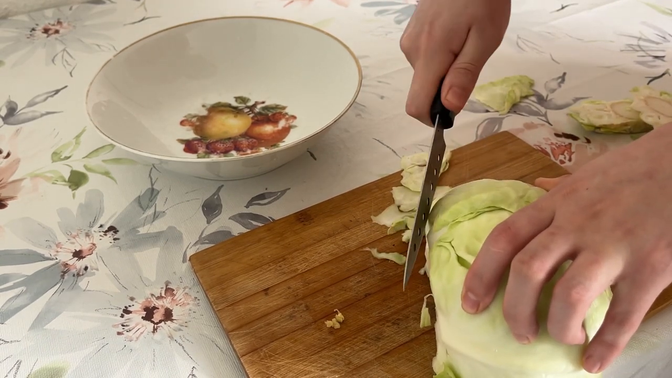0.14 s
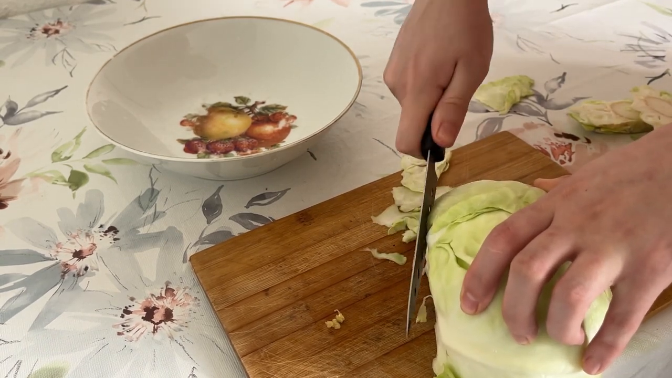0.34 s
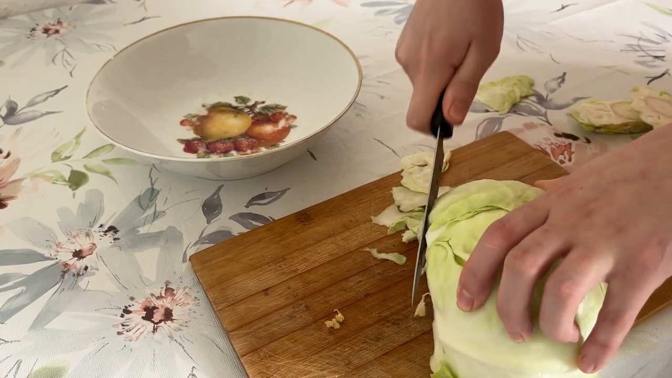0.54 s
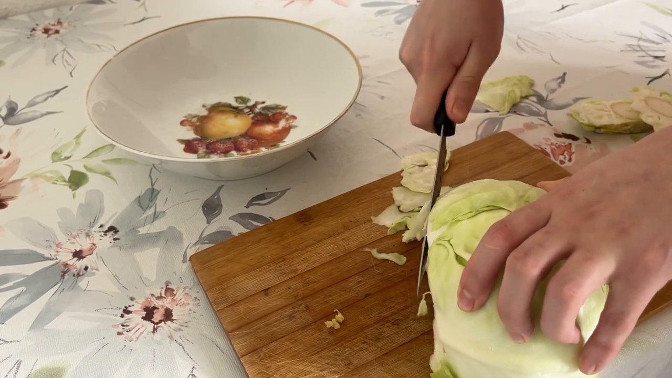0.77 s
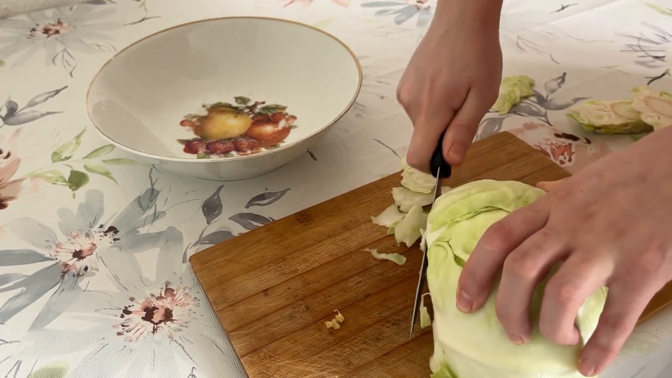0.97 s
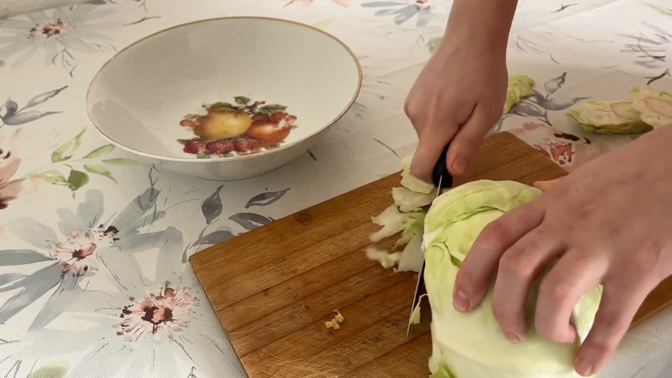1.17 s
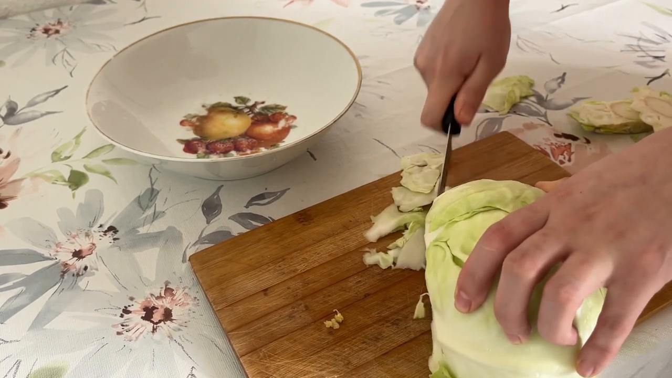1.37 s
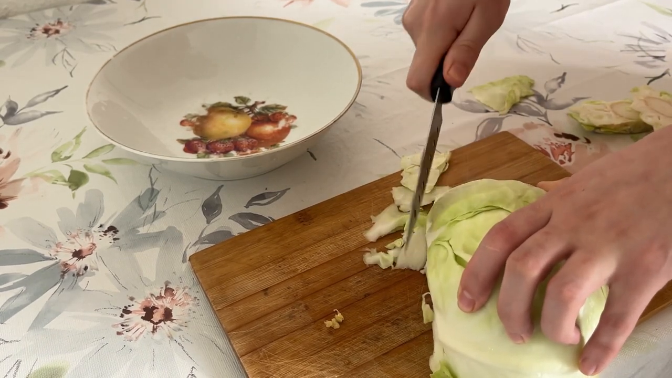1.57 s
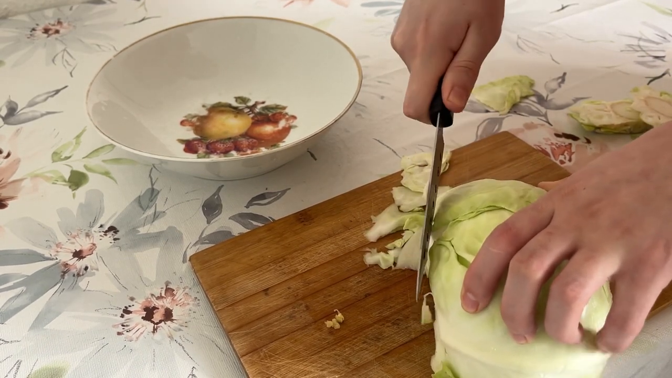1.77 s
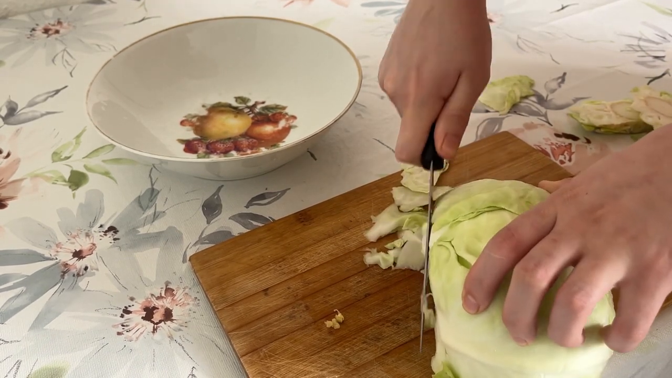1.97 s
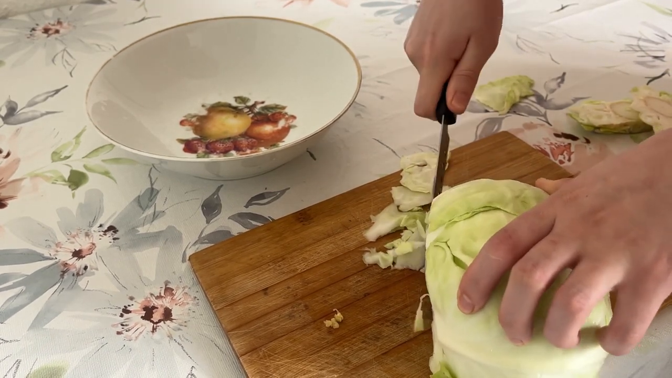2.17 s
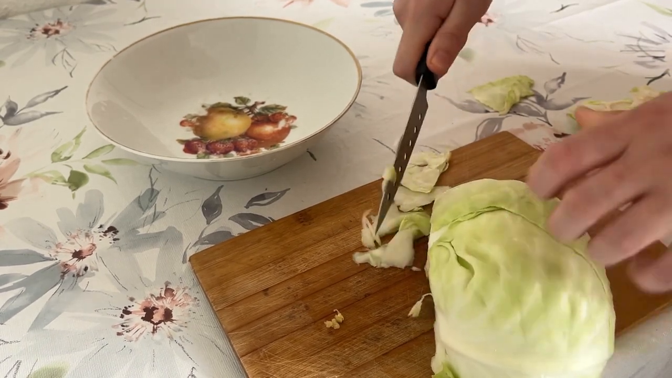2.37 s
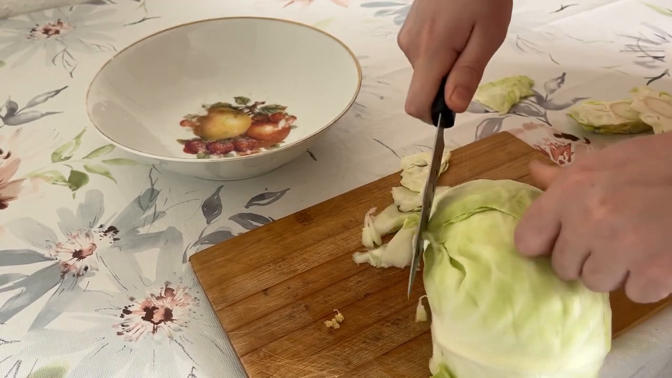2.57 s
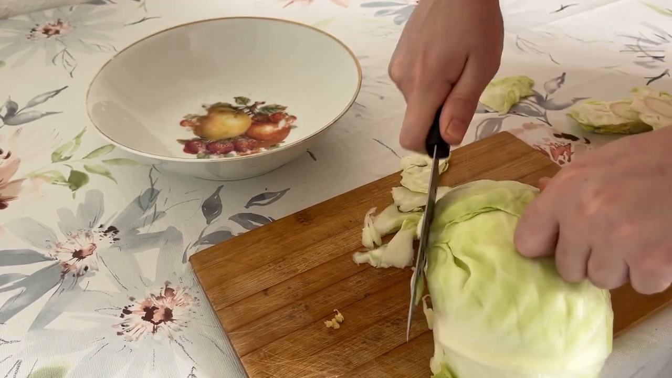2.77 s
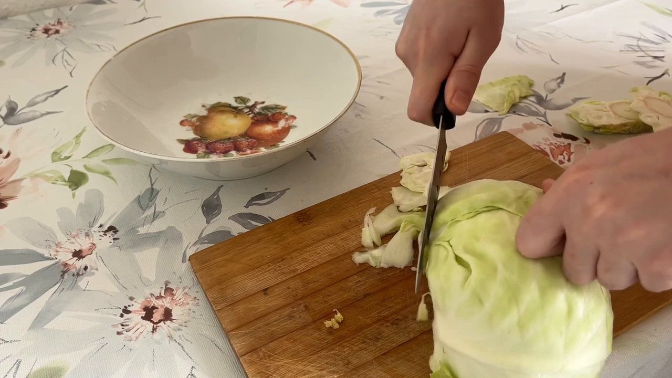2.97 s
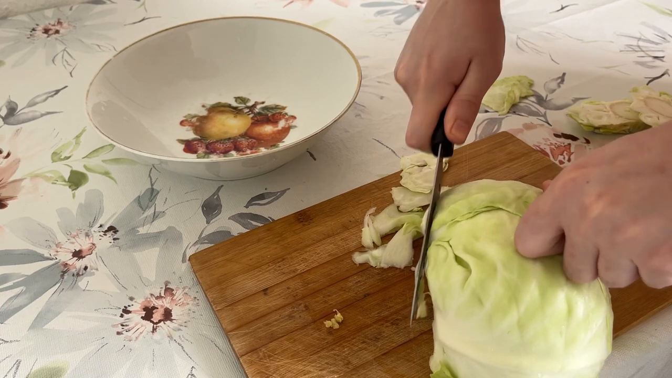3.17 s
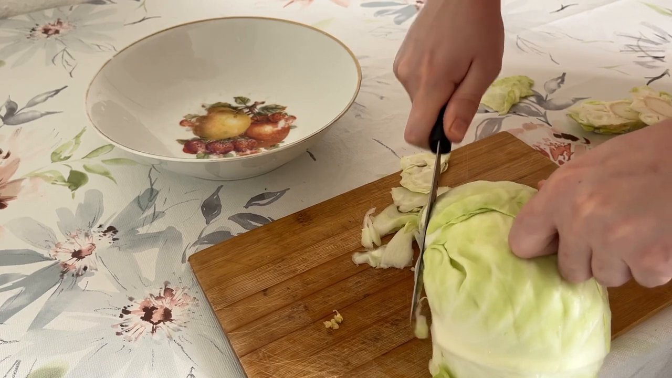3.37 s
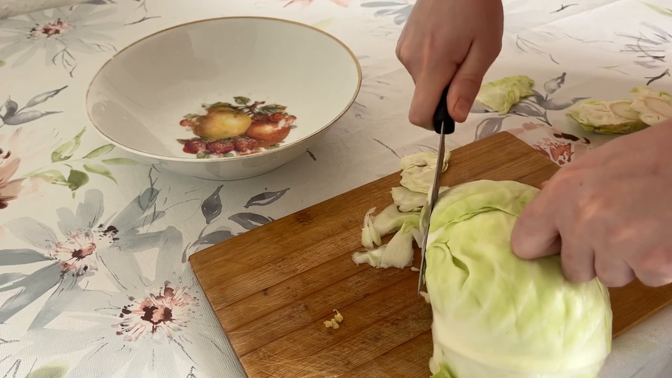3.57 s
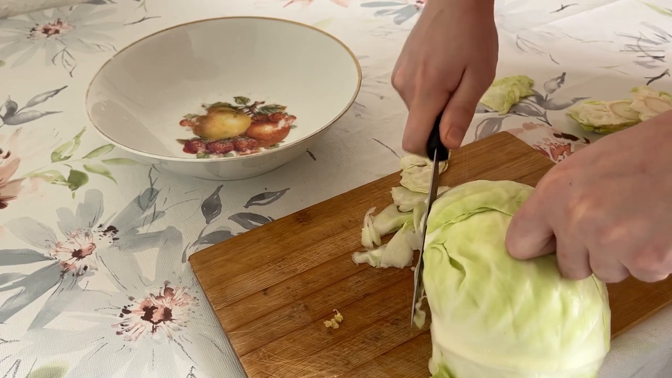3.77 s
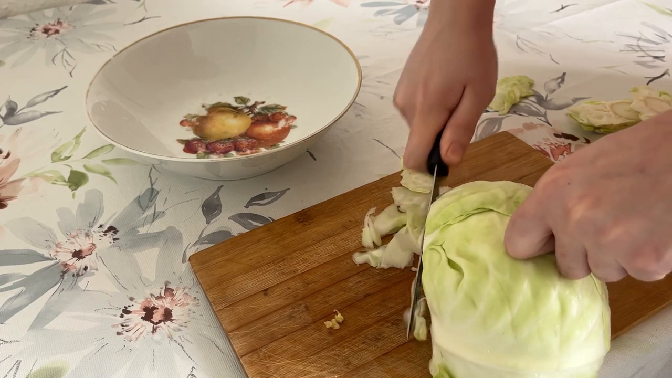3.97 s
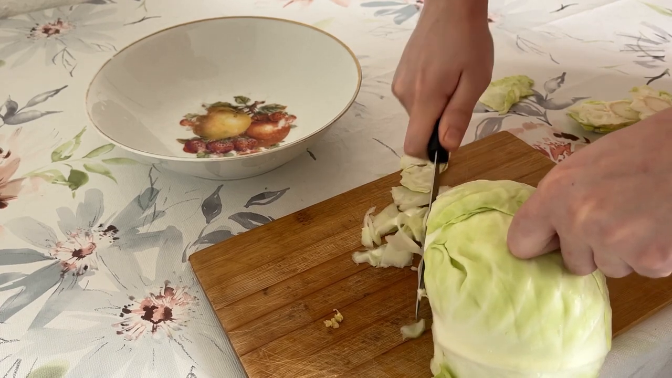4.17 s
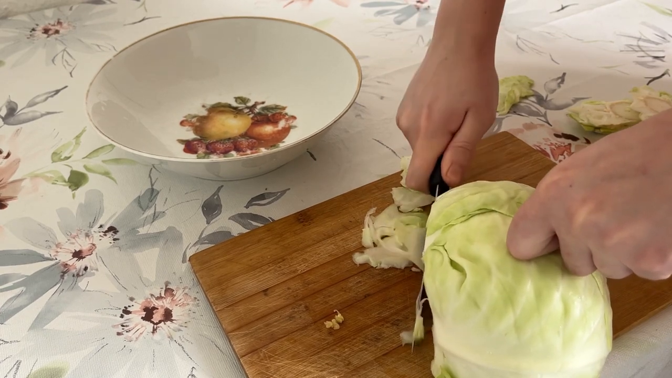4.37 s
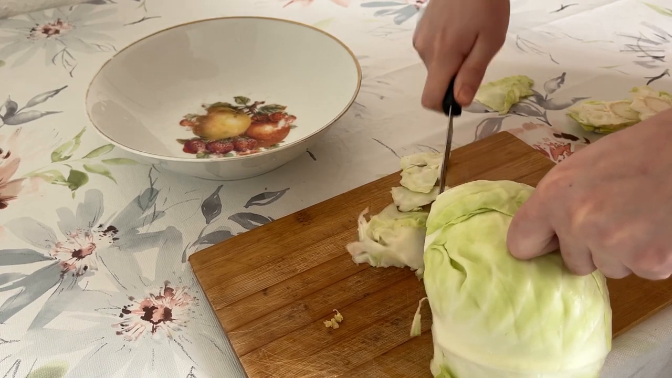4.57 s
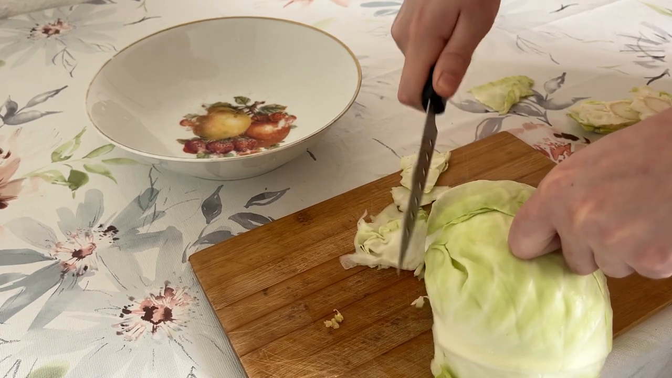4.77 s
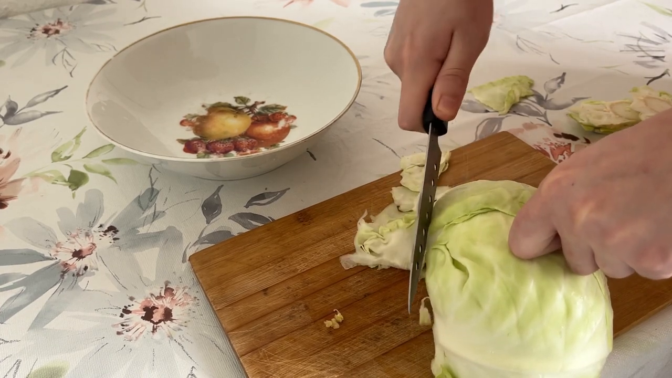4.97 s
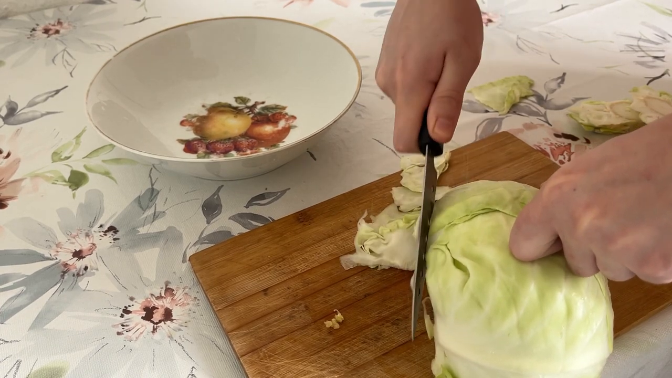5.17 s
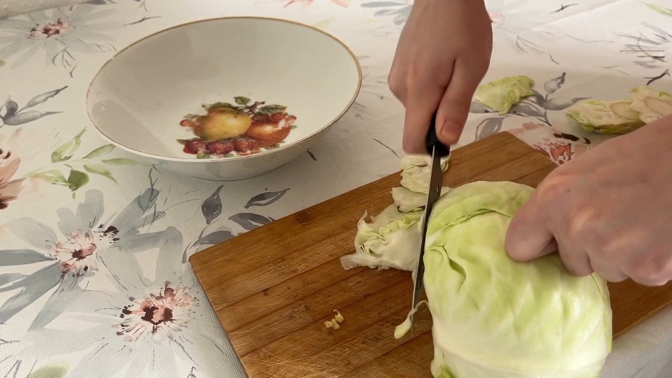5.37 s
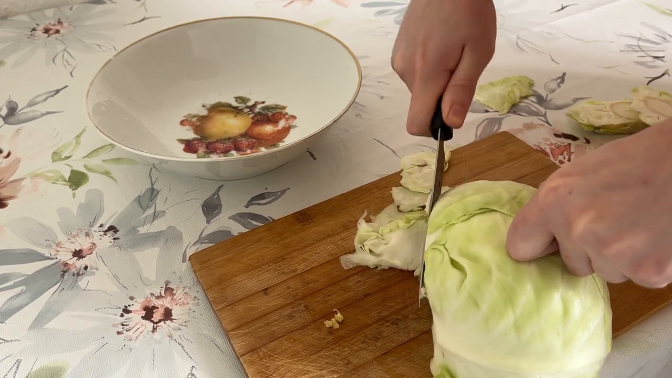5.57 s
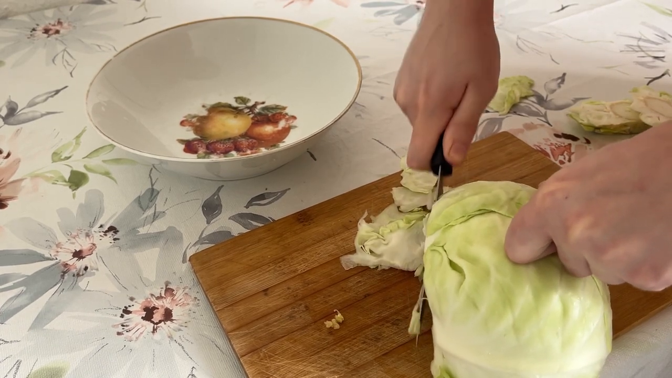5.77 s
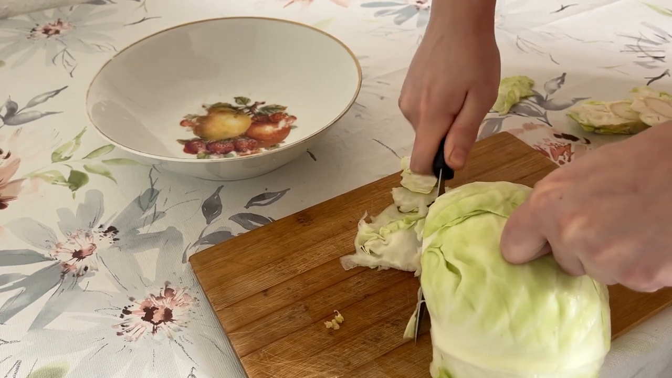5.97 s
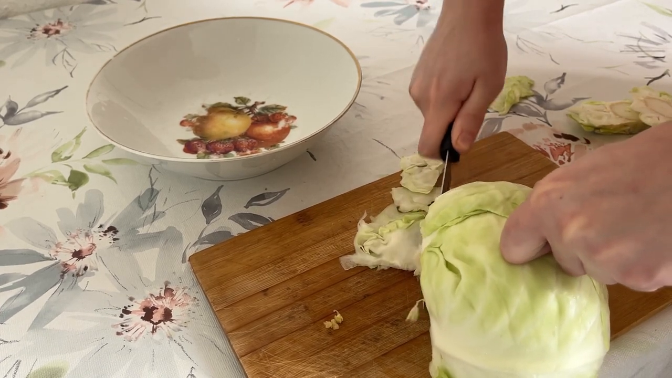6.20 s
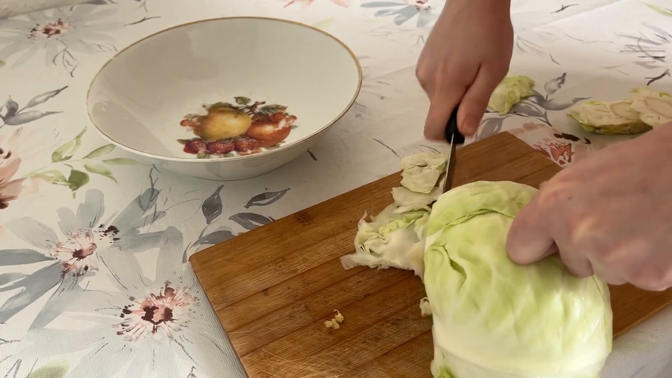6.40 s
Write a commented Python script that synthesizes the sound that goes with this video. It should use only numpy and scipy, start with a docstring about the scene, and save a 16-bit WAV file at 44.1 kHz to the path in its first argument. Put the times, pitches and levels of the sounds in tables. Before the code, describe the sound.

Close, wet crackling of cabbage being sliced, with snapping ribs, brief blade squeaks and a few woody knocks in a small quiet kitchen.

```python
"""A small kitchen: a knife saws through a cabbage on a wooden board, close to a pair of small microphones.
Each stroke is a dense crackle of random fractures, coarse tearing plus fine fizz; single ribs snap as noise bursts.
The blade knocks on the board (modal ring plus steel tick) and drags over it (random slips into the same modes).
Gliding resonances squeak and decaying low sines thump.
A low hum wavers over room noise; dense decaying reflections give the reverberation."""
import sys
import numpy as np
from scipy import signal
from scipy.fft import rfft, irfft
from scipy.io import wavfile
from scipy.ndimage import uniform_filter1d

SR = 44100
rng = np.random.default_rng(int(sys.argv[2]) if len(sys.argv) > 2 else 0)


def waveform_to_disk(signal):
    """Save audio, clipped to [-1, 1], as 16-bit WAV at the path in sys.argv[1]."""
    frames = np.transpose(np.atleast_2d(signal))
    scaled = np.clip(frames, -1, 1) * 32767
    samples = np.round(scaled).astype(np.int16)
    wavfile.write(sys.argv[1], SR, samples)


N = 283959
T = np.arange(N) / SR  # s

# Room noise spectrum. Each row: frequency in Hz, relative density in dB per Hz.
AIR_SPECTRUM = [(24, -26.5), (40, 4.5), (65, 8.5), (110, 4), (165, -8.5), (270, -2.5), (360, -8), (470, -7),
                (700, -17), (950, -11), (1600, -18.5), (2300, -30.5), (5000, -44.5), (15000, -84.5)]
# Low hum. Each row: time in seconds, relative level in dB, mean pitch in Hz.
HUM_CURVE = [(0.0, -41.5, 54.9), (0.68, -46, 53.74), (0.81, -62, 57.6), (0.84, -43, 61), (0.9, -55, 58.8),
             (1.22, -53, 53.3), (2.29, -42, 53.2), (2.54, -55.5, 53), (2.72, -46.5, 55.6),
             (2.83, -57, 64.9), (2.92, -52, 65.3), (3.08, -54, 55.9), (3.19, -43, 56.0), (3.3, -54, 55.4),
             (3.68, -47, 61.74), (4.02, -40.5, 61.36), (4.86, -56.5, 58.6), (5.09, -57, 55.24),
             (5.38, -51, 59.2), (5.54, -51, 54.5), (6.38, -50.5, 52.77), (6.44, -58, 52)]
# Nearly steady hum lines. Each row: mean frequency in Hz, level in dB.
HUM_LINES_HZ_DB = [(98, -57.5), (120, -77), (199, -63)]
# Sawing strokes, to and fro. Each row: start in seconds, speeding up in seconds, slowing down in seconds,
# crunch in dB, juicy fizz relative to the crunch in dB, hollow body of the head relative to the crunch in dB.
SAW_STROKES = [(0.181, 0.13, 0.1, -58.5, 1.5, 2), (0.36, 0.1, 0.11, -64.5, 2.5, 1),
               (0.51, 0.047, 0.15, -51, 0, -0.5), (0.785, 0.063, 0.21, -52.5, -0.5, -0.5),
               (0.96, 0.1, .13, -64.5, -4, 1), (1.09, 0.042, 0.031, -44, -2.5, -3.5),
               (1.135, 0.028, 0.13, -48.5, -14, 13), (1.248, .095, 0.14, -51, -4.5, 3),
               (1.745, 0.19, 0.04, -52.5, 2, -1.5), (1.959, .015, 0.18, -54.5, -4.5, -4.5),
               (2.061, 0.017, 0.1, -60, -4.5, 18), (2.47, 0.078, 0.35, -72, -11, 12),
               (2.59, 0.2, 0.071, -59.5, -2, 0), (2.81, 0.11, 0.17, -61.5, -9, -6),
               (2.995, 0.057, 0.15, -54, -2.5, -1), (3.12, 0.12, 0.095, -66, 0, 3),
               (3.285, 0.081, 0.13, -58.5, -1, 3), (3.46, 0.057, 0.1, -66, -3, 0.5),
               (3.57, 0.078, 0.29, -61, -0.5, 2), (3.859, .155, 0.087, -53, -2, 1.5),
               (4.11, 0.033, 0.15, -56, -12, -5.5), (4.23, 0.084, 0.067, -46.5, -1.5, 1),
               (4.35, .14, 0.19, -50, -7, 3.5), (4.82, 0.079, 0.069, -63.5, -2, -5),
               (4.98, 0.098, 0.15, -58, -2, -5.5), (5.14, 0.089, 0.13, -58, -7, -5),
               (5.27, 0.13, 0.1, -54, -5, 2), (5.47, 0.036, 0.18, -61.5, -5, 1),
               (5.595, 0.073, 0.095, -45.5, -2, -0.5), (5.73, 0.067, 0.22, -61, -8, -2.5),
               (5.885, 0.088, 0.077, -49, -3, -3), (6.0, 0.12, 0.17, -55.5, -4.5, -9),
               (6.174, 0.026, 0.13, -48.5, -7.5, 7.5), (6.31, 0.11, 0.26, -53, -7, 0)]
# Coarse tearing of the leaf ribs. Each row: frequency in Hz, relative gain in dB.
TEAR_SPECTRUM = [(100, 7), (300, 6.5), (700, 11.5), (1100, 8.5), (1800, 5.5), (2400, 3), (3200, 2.5),
                 (4200, 2), (6500, -3), (8000, -7.5), (10000, -4.5), (14000, -43.5)]
# Fine bursting of cells. Each row: frequency in Hz, relative gain in dB.
FIZZ_SPECTRUM = [(3000, -43), (6500, -0.5), (8500, -6), (11000, 0), (13000, 0), (15700, -6.5)]
# Wet steel squeaking on leaf or wood. Each row: start in seconds, length in seconds, level in dB,
# starting pitch in Hz, ending pitch in Hz, relative width in Hz.
BLADE_SQUEAKS = [(0.845, 0.087, -50.5, 3370, 3170, 800), (1.108, 0.081, -35, 1677, 1670, 60),
                 (1.296, 0.086, -33.5, 1830, 1940, 199), (1.277, 0.097, -43.5, 3080, 3270, 1090),
                 (1.787, 0.063, -54, 1286, 1240, 130), (2.081, 0.038, -36.5, 940, 880, 318),
                 (4.419, .12, -36, 1760, 1870, 220), (4.413, 0.099, -43.5, 3000, 2940, 802),
                 (4.99, 0.17, -59.5, 4180, 4350, 800), (5.162, 0.045, -53, 4105, 4050, 600),
                 (5.29, 0.15, -55.5, 6800, 6200, 1190), (5.334, 0.057, -54, 910, 922, 130),
                 (5.643, 0.052, -40, 890, 780, 259), (5.978, 0.17, -45.5, 1626, 1396, 218.6),
                 (6.36, 0.24, -42.5, 1830, 1920, 190)]
# Single ribs snapping. Each row: time in seconds, relative peak in dB, centre in Hz,
# treble relative to the body in dB.
RIB_SNAPS = [(0.9514, -39, 4430, -6), (1.6402, -56.5, 4540, -1), (1.9726, -25, 2730, 1),
             (2.2185, -45, 2550, -11), (2.383, -46.5, 6160, -17.5), (2.5274, -51, 4450, -4),
             (3.1373, -45, 4500, -5), (3.187, -41.5, 2200, -12), (3.498, -37, 2300, -7),
             (3.7503, -52, 6955, -5), (4.141, -39, 3036, -16), (5.168, -35.5, 4994, -7),
             (5.5073, -34.5, 4300, -26), (5.62, -37.5, 5500, -12), (5.7438, -36.5, 2754, -13),
             (6.074, -30, 2880, -17), (6.185, -25, 2400, -10), (6.326, -39, 2870, -24)]
# Blade landing on the board. Each row: time in seconds, force in dB, sharpness of the blow in Hz,
# boost of the modes at 1-2 kHz in dB, ring time as a factor.
BLADE_KNOCKS = [(1.1335, -1.5, 4260, 0.5, 1.02), (2.0729, -15, 2330, -14.5, 1.08),
                (2.096, -27, 2400, -7.5, 1.3), (3.751, -37.5, 1790, 1.5, 0.87),
                (4.3173, -3, 1720, 0.5, 0.74), (5.9702, -4.5, 1930, 2, 0.7), (6.072, -36, 3060, 2, 1),
                (6.1845, -17.5, 4000, -2, 0.38), (6.1964, -23, 2410, -8, 0.47),
                (6.201, -13, 2770, 0.5, 0.77), (6.327, -44, 3980, -5, 0.93)]
# Modes of the board with the blade on it. Each row: frequency in Hz, height in dB,
# t60 in seconds at a ring factor of 1.
BOARD_MODES = [(194, -27, 0.12), (290, -19, 0.037), (461, -18.5, 0.056), (725, -23.5, 0.043),
               (873, -17, 0.16), (938, -10, 0.044), (1234, -14, 0.016), (1352, -12, 0.037),
               (1564, -10.5, 0.011), (1770, -10, 0.011), (1882, -11.5, 0.025), (2660, -24.5, 0.023),
               (3123, -9.5, 0.0094)]
# How well the board radiates. Each row: frequency in Hz, gain in dB.
BOARD_RADIATION = [(40, -29.5), (160, -3), (350, -9), (450, -1.5), (1900, 1), (2200, 2.5), (2800, 4),
                   (3400, 3), (4200, -3), (8000, -17)]
# Edge dragging over the board. Each row: start in seconds, speeding up in seconds, slowing down in seconds,
# relative level in dB, sharpness of the slips in Hz.
EDGE_DRAGS = [(1.19, 0.088, 0.12, -38, 3240), (1.26, 0.11, 0.104, -37.5, 4340),
              (1.39, .022, .025, -39.5, 1500), (4.25, 0.051, 0.075, -43, 2500), (4.34, .14, .15, -35, 3000),
              (4.47, .04, .075, -38, 1050), (5.605, 0.081, 0.11, -44.5, 630),
              (5.99, 0.049, 0.089, -38.5, 1300), (6.09, 0.064, 0.031, -41, 3220),
              (6.19, 0.067, 0.096, -40, 2720), (6.31, 0.066, 0.22, -39.5, 3370)]
# Cabbage rocking on the board. Each row: time in seconds, relative level in dB, pitch in Hz, t60 in seconds.
HEAD_THUMPS = [(2.085, -40.5, 279, 0.16), (4.825, -48, 391, 0.13), (5.701, -35, 100, 0.15),
               (5.717, -39, 148, 0.13)]
# Phase between the microphone ports. Each row: frequency in Hz, lead of the left in radians.
PORT_LEAD = [(0, 0), (400, 0), (750, .4), (1250, -.4), (1900, .1), (3000, .8), (4800, .3), (5900, -1),
             (6700, -.7), (7800, -3), (8800, -3.2), (11200, -6.2), (13000, -6.3), (14700, -9.3)]
# Level between the microphone ports. Each row: frequency in Hz, left minus right in dB.
PORT_TILT = [(300, -2), (600, 0.5), (950, 4), (1400, 0.5), (2000, 2), (3200, 3.5), (6000, 3.5),
             (8000, -0.5)]
# Kitchen reverberation, late part. Each row: frequency in Hz, t60 in seconds.
ROOM_DECAY = [(150, .5), (500, 0.69), (1500, 0.57), (3500, 0.35), (8000, 0.037), (15000, 0.17)]

WASH_START_DB, WASH_SINK_DB_PER_S = 4.5, 2.12  # room noise above its rumble
STROKE_RISE_EXPONENT, STROKE_FADE_DB, STROKE_FADE_EXPONENT = 1.83, -19, 1.35
RESTING_DB, RESTING_FIZZ_DB = -77.5, -10  # leaves creaking under the hand; their fizz relative to that
FIZZ_EXPONENT = 1.18  # fizz grows faster with speed than crunch
BAND_EDGE_HZ = 15800


def gain_of(db):
    """Decibels to amplitude."""
    return 10 ** (np.asarray(db) / 20)


def evened(x):
    """Scales to an rms of 1."""
    return x / np.sqrt(np.mean(x ** 2) + 1e-20)


def read(points, hz):
    """Interpolates a spectrum table on a log-frequency axis."""
    f, value = np.transpose(points)
    return np.interp(np.log(hz + 1), np.log(f + 1), value)


def follow(rows):
    """Interpolates timed rows to one signal per column."""
    s, *columns = np.transpose(rows)
    return [np.interp(T, s, c) for c in columns]


def add(mix, s, sound):
    """Mixes a sound in at time s, cut at the end of the mix."""
    part = mix[max(round(s * SR), 0):][:len(sound)]
    part += sound[:len(part)]


def colour(x, points):
    """Filters a signal by a spectrum table."""
    gain = gain_of(read(points, np.fft.rfftfreq(N, 1 / SR)))
    return irfft(rfft(x) * gain, N)


def drift(rate_hz):
    """Slow random wander of rms 1: smoothed line between random knots."""
    knot_s = np.arange(0, T[-1] + 1, .5 / rate_hz)
    wander = np.interp(T, knot_s, rng.standard_normal(len(knot_s)))
    return evened(uniform_filter1d(wander, int(SR * .5 / rate_hz)))


def crackle(per_s, spread_db):
    """Random tiny fractures, most small and a few large, at an rms of 1."""
    size = gain_of(spread_db * np.minimum(rng.exponential(1, N), 4))
    sign = rng.choice([-1, 1], N)
    return evened(size * sign * (rng.random(N) < per_s / SR))


def stroke(start_s, rise_s, fall_s):
    """Loudness of one pass of the blade: it gathers speed along a sine, then stalls."""
    speeding = np.sin(np.pi / 2 * np.clip((T - start_s) / rise_s, 0, 1)) ** STROKE_RISE_EXPONENT
    stalling = np.clip((T - start_s - rise_s) / fall_s, 0, 10) ** STROKE_FADE_EXPONENT
    return speeding * gain_of(STROKE_FADE_DB * stalling)


def air(level_db=-50.0, side_highpass_hz=700, side_gain=1.54, rumble_hz=250):
    """Steady rumble, alike at both ports, under a wider wash that slowly sinks."""
    mid, side = colour(rng.standard_normal((2, N)), AIR_SPECTRUM)
    side = side_gain * signal.lfilter(*signal.butter(1, side_highpass_hz, "high", fs=SR), side)
    noise = gain_of(level_db) * np.array([mid + side, mid - side]) / mid.std()
    rumble = signal.filtfilt(*signal.butter(2, rumble_hz, fs=SR), noise)
    wash_gain = gain_of(WASH_START_DB - WASH_SINK_DB_PER_S * T)
    return rumble + wash_gain * (noise - rumble)


def sine(hz):
    """Sine of rms 1 following a pitch signal."""
    return np.sqrt(2) * np.sin(2 * np.pi * np.cumsum(hz) / SR)


def hum(trim_db=-1.0, throb_db=3.0, waver_hz=3, line_throb_db=0.34, line_waver_hz=1.5):
    """Low drone wavering in pitch and level, with nearly steady lines above it."""
    db, hz = follow(HUM_CURVE)
    level = gain_of(db + trim_db + throb_db * drift(rate_hz=9.8))
    out = level * sine(hz + waver_hz * drift(rate_hz=9))
    for line_hz, line_db in HUM_LINES_HZ_DB:
        level = gain_of(line_db + line_throb_db * drift(rate_hz=3))
        out = out + level * sine(line_hz + line_waver_hz * drift(rate_hz=6))
    return out


def slicing(tear_db=5.5, fizz_db=2.5, fibre_db=-7, clump_db=1.5, body_hz=2200):
    """Leaf after leaf fractures in clumps, tougher fibres snap singly; deep in the head it sounds hollow."""
    crunch, hollow = np.full((2, N), gain_of(RESTING_DB))
    juicy = np.full(N, gain_of(RESTING_DB + RESTING_FIZZ_DB))
    for start_s, rise_s, fall_s, db, juice_db, body_db in SAW_STROKES:
        speed = stroke(start_s, rise_s, fall_s)
        crunch = np.hypot(crunch, gain_of(db) * speed)
        hollow = np.hypot(hollow, gain_of(db + body_db) * speed)
        juicy = np.hypot(juicy, gain_of(db + juice_db) * speed ** FIZZ_EXPONENT)
    cells = crackle(per_s=8000, spread_db=3.0)
    fibres = gain_of(fibre_db) * crackle(per_s=350, spread_db=1.5)
    tear = gain_of(tear_db) * evened(colour(cells + fibres, TEAR_SPECTRUM))
    body = signal.filtfilt(*signal.butter(2, body_hz, fs=SR), tear)
    fizz = gain_of(fizz_db) * evened(colour(crackle(per_s=7400, spread_db=3.0), FIZZ_SPECTRUM))
    clumps = gain_of(clump_db * drift(rate_hz=70))
    return clumps * (crunch * (tear - body) + hollow * body + juicy * fizz)


def resonate(x, hz, width_hz):
    """Moving resonance: shifts the curve hz down to zero, smooths twice, shifts back."""
    turn = np.exp(2j * np.pi * np.cumsum(hz) / SR)
    r = np.exp(-np.pi * width_hz / SR)
    return (turn * signal.lfilter([(1 - r) ** 2], [1, -2 * r, r * r], x / turn)).real


def squeaks(width_factor=1.18):
    """Slips lock on to one blade resonance for a moment; it glides with the point of contact."""
    out = np.zeros(N)
    for s, length_s, db, start_hz, end_hz, width_hz in BLADE_SQUEAKS:
        n = int(length_s * SR)
        glide_hz = np.linspace(start_hz, end_hz, n)
        tone = resonate(rng.standard_normal(n), glide_hz, width_factor * width_hz)
        add(out, s, gain_of(db) * evened(tone) * np.sin(np.linspace(0, np.pi, n)))
    return out


def snaps(trim_db=-11, rise_s=0.0015, spray_hz=7500):
    """A rib gives way in a burst of a few milliseconds: band noise plus treble spray."""
    out, t = np.zeros(N), np.arange(SR // 30) / SR
    burst = t / rise_s * np.exp(1 - t / rise_s)
    for s, db, hz, treble_db in RIB_SNAPS:
        low, high = rng.standard_normal((2, len(t)))
        body = evened(signal.lfilter(*signal.butter(2, [hz / 1.5, hz * 1.5], "band", fs=SR), low))
        spray = evened(signal.lfilter(*signal.butter(2, spray_hz, "high", fs=SR), high))
        add(out, s, gain_of(db + trim_db) * burst * (body + gain_of(treble_db) * spray))
    return out


def soften(x, hz):
    """A longer contact takes the treble out of a blow."""
    return signal.lfilter(*signal.butter(3, min(hz, SR / 3), fs=SR), x)


def spread(x, lag_hz=(800, 1350), q=2.6):
    """Bending waves lag the first crack: allpasses delay the middle by a millisecond or two each."""
    for hz in lag_hz:
        a = signal.iirpeak(hz, q, SR)[1]
        x = signal.lfilter(a[::-1], a, x)
    return x


def board(upper_db, ring):
    """Ring of board and blade after one push: causal response with a peak for every mode."""
    f, power = np.fft.rfftfreq(SR // 6, 1 / SR), 1e-8
    for hz, db, t60_s in BOARD_MODES:
        half_width_hz = np.log(1000) / (2 * np.pi * t60_s * ring)
        height = gain_of(db + upper_db * (1000 < hz < 2000)) * SR / (2 * np.pi)
        power = power + abs(height * hz / (hz ** 2 + (half_width_hz + 1j * f) ** 2)) ** 2
    log_gain = np.log(power) / 2 + np.log(gain_of(read(BOARD_RADIATION, f)))
    # minimum phase from the log magnitude
    causal = np.conj(signal.hilbert(np.r_[log_gain, log_gain[-2:0:-1]]))
    return spread(np.fft.ifft(np.exp(causal)).real)


def knocks(tick_db=-42, tick_t60_s=0.014):
    """The edge pushes the wood modes with a small tick of steel; a loosely held blade damps them less."""
    out, t = np.zeros(N), np.arange(SR // 6) / SR
    for s, db, sharp_hz, upper_db, ring in BLADE_KNOCKS:
        tick = gain_of(tick_db - 60 * t / tick_t60_s) * rng.standard_normal(len(t))
        wood = soften(board(upper_db, ring), sharp_hz)
        add(out, s, gain_of(db) * (wood + tick))
    return out


def drags(trim_db=-1, dull_hz=600, bright_hz=4500, jerk_db=4.0):
    """Stick and slip of the edge shakes the board; sharpness blends a dull and a bright version."""
    dull, bright = np.zeros((2, N))
    for start_s, rise_s, fall_s, db, sharp_hz in EDGE_DRAGS:
        power = (gain_of(db) * stroke(start_s, rise_s, fall_s)) ** 2
        share = np.clip(np.log(sharp_hz / dull_hz) / np.log(bright_hz / dull_hz), 0, 1)
        dull = dull + (1 - share) * power
        bright = bright + share * power
    slips = crackle(per_s=2500, spread_db=2.0) * gain_of(jerk_db * drift(rate_hz=32))
    wood = signal.oaconvolve(slips, board(upper_db=0.5, ring=1.0))[:N]
    dull_wood = np.sqrt(dull) * evened(soften(wood, dull_hz))
    bright_wood = np.sqrt(bright) * evened(soften(wood, bright_hz))
    return gain_of(trim_db) * (dull_wood + bright_wood)


def thumps(trim_db=4.5, rise_s=0.0067):
    """Soft, low pushes of the cabbage head: decaying sines."""
    out, t = np.zeros(N), np.arange(SR // 4) / SR
    for s, db, hz, t60_s in HEAD_THUMPS:
        envelope = gain_of(db + trim_db - 60 * t / t60_s) * (1 - np.exp(-t / rise_s))
        add(out, s, envelope * np.sin(2 * np.pi * hz * t))
    return out


def ports(x):
    """Near sound reaches the two ports with different phase and level."""
    hz = np.fft.rfftfreq(N, 1 / SR)
    lead_rad, tilt_db = np.interp(hz, *np.transpose(PORT_LEAD)), read(PORT_TILT, hz)
    left, right = gain_of(tilt_db / 2), gain_of(-tilt_db / 2) * np.exp(-1j * lead_rad)
    return irfft(rfft(x) * np.array([left, right]), N)


def kitchen(x, first_s=.007, early_db=2, early_t60_s=0.074, side_highpass_hz=950, side_gain=1.77):
    """Dense reflections, strongest from the near walls, each band dying at its own speed."""
    shape = (2, SR * 3 // 4)
    taps = rng.standard_normal(shape) * (rng.random(shape) < .15)
    hz, t, z = signal.stft(taps, SR, nperseg=256)
    late = gain_of(-60 * t / read(ROOM_DECAY, hz)[:, None])
    early = gain_of(early_db - 60 * t / early_t60_s)
    mid, side = signal.istft(z * (late + early), SR, nperseg=256)[1]
    side = side_gain * signal.lfilter(*signal.butter(1, side_highpass_hz, "high", fs=SR), side)
    tail = np.pad([mid + side, mid - side], ((0, 0), (int(first_s * SR), 0)))
    return signal.fftconvolve(x[None], tail / np.linalg.norm(tail[0]), axes=1)[:, :N]


def moving_kitchen(x, cycles_per_s=2.5, count=3):
    """Blade and hands keep moving, so the reflections fade between several random tails."""
    out = 0
    for k in range(count):
        weight = np.sqrt(2 / count) * np.cos(np.pi * (cycles_per_s * T + k / count))
        out = out + kitchen(x * weight)
    return out


def scene(knock_room_db=-4, drag_room_db=-5, leaf_room_db=-8):
    """Knife, cabbage and board in the humming kitchen."""
    leaves = slicing() + snaps()
    wood = knocks() + thumps()
    drag = drags() + squeaks()
    sent = gain_of(knock_room_db) * wood + gain_of(drag_room_db) * drag + gain_of(leaf_room_db) * leaves
    return ports(wood + drag + leaves) + moving_kitchen(sent) + hum() + air()


def record(dry):
    """The recorder's band limit: a linear-phase low-pass."""
    lowpass = signal.firwin(511, BAND_EDGE_HZ, window=("kaiser", 9), fs=SR)
    return signal.oaconvolve(dry, lowpass[None], "same")


dry = scene()
out = record(dry)
waveform_to_disk(out)
```